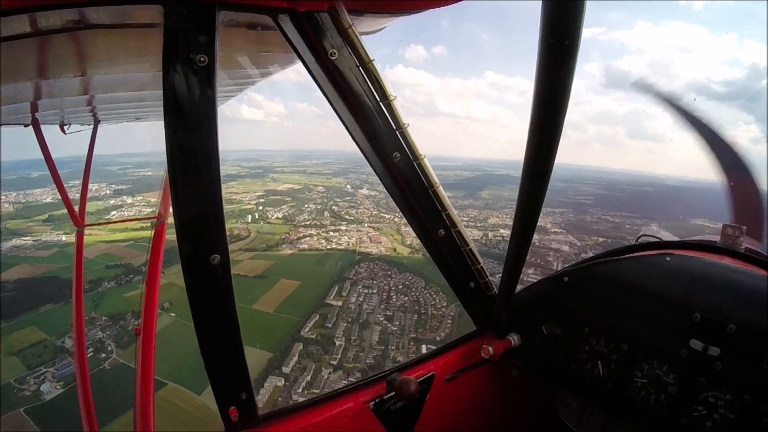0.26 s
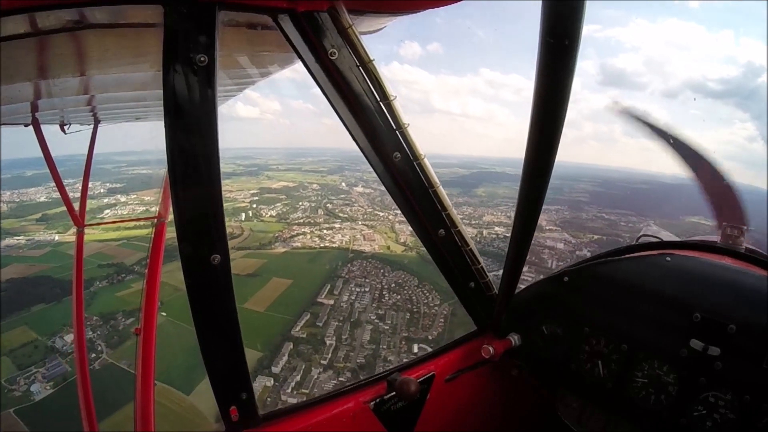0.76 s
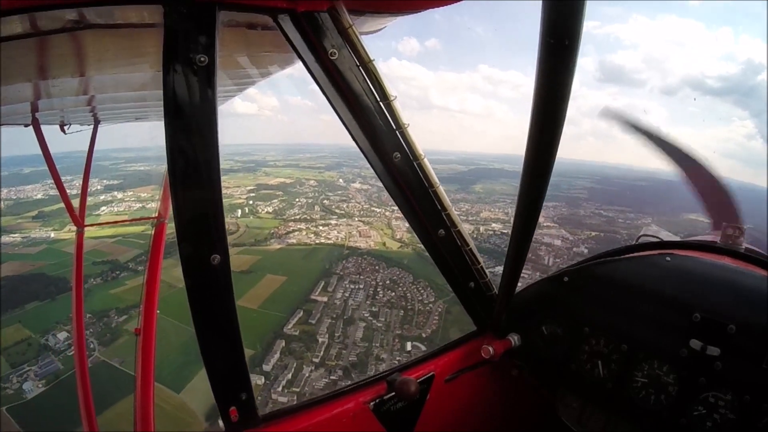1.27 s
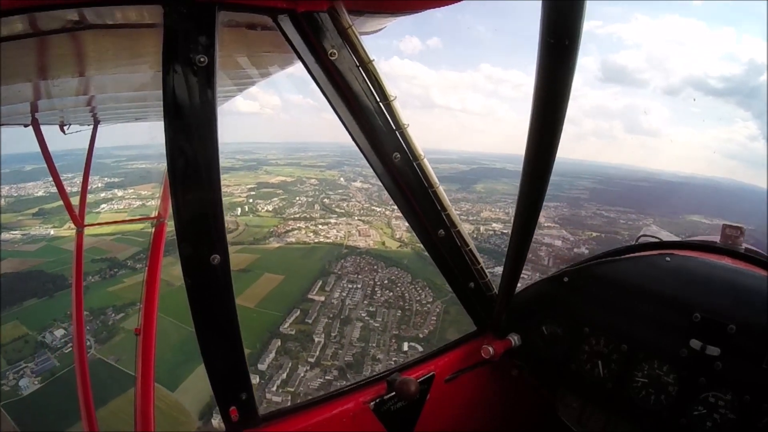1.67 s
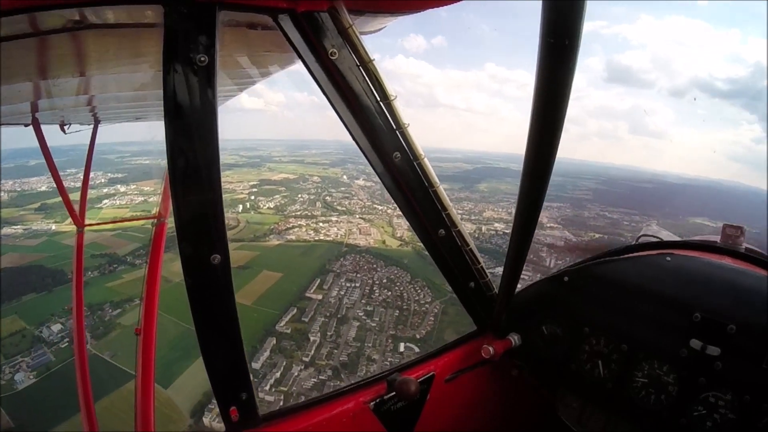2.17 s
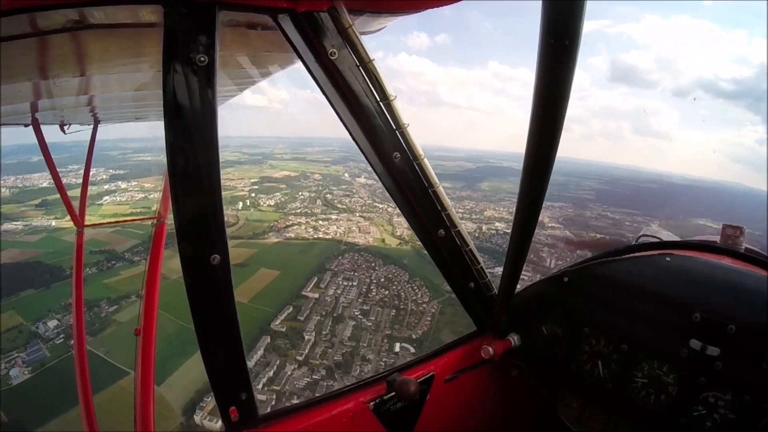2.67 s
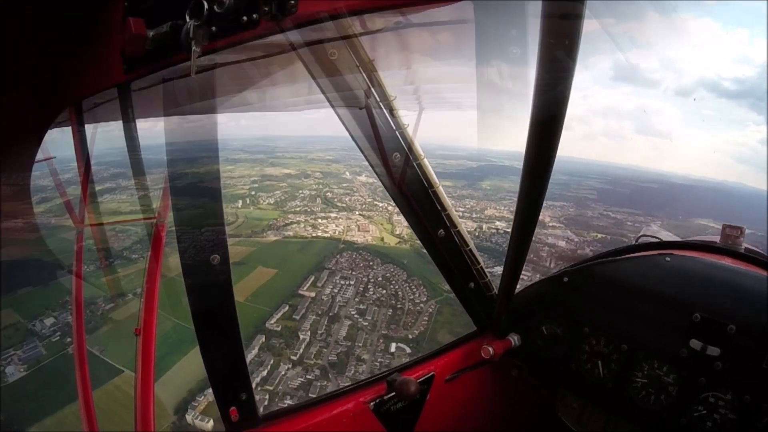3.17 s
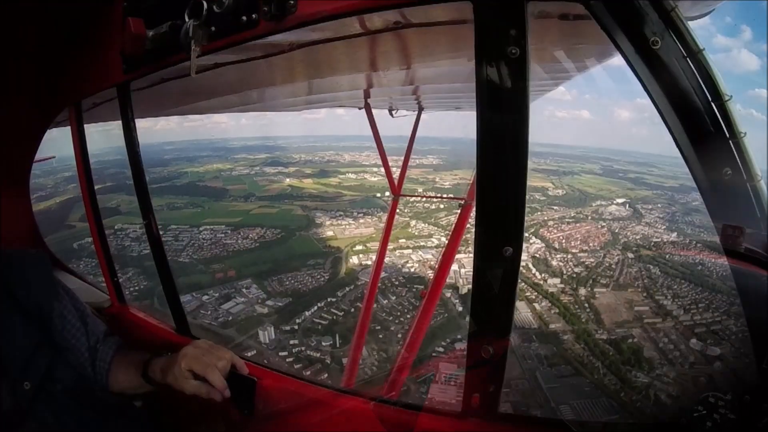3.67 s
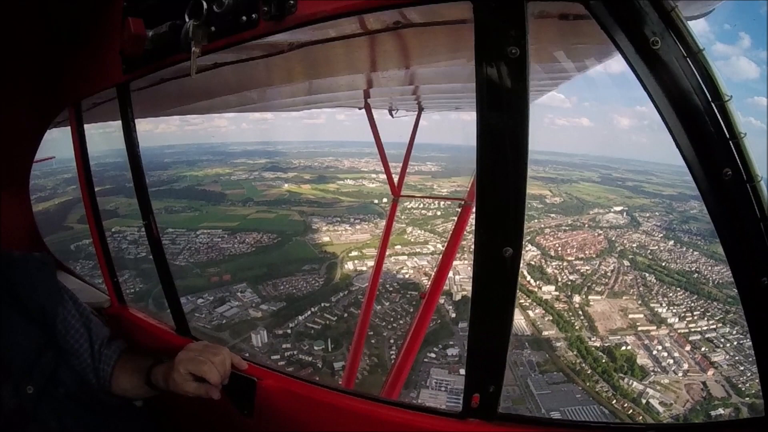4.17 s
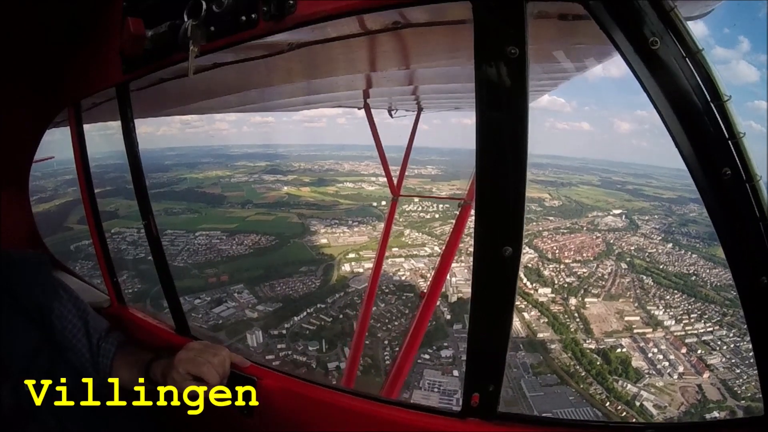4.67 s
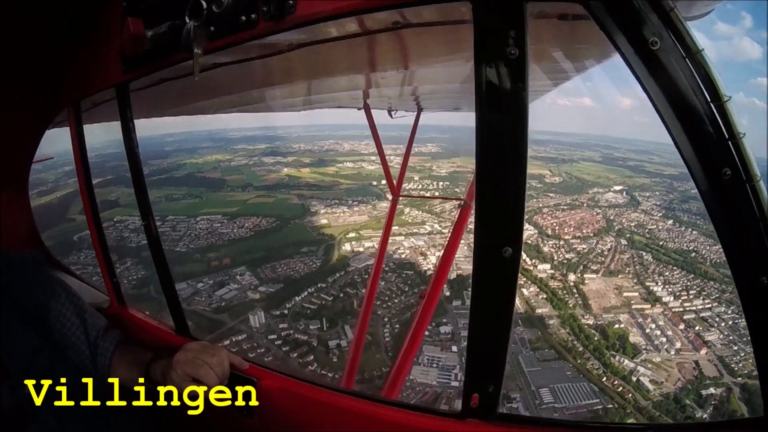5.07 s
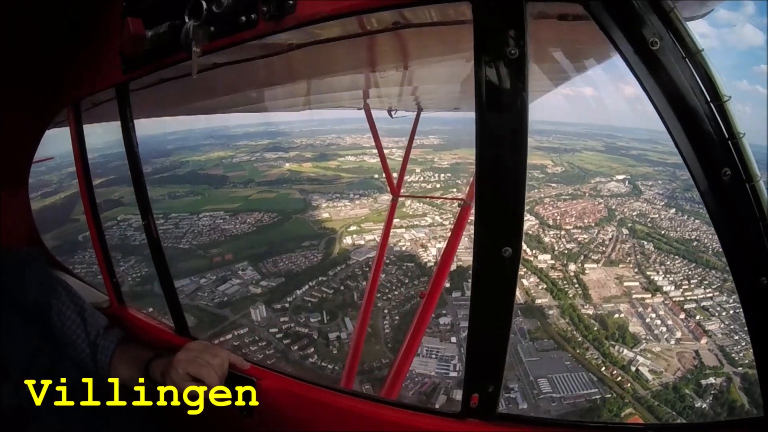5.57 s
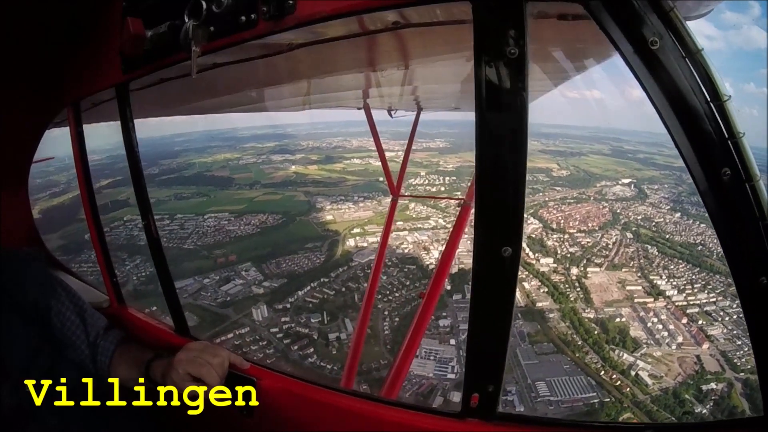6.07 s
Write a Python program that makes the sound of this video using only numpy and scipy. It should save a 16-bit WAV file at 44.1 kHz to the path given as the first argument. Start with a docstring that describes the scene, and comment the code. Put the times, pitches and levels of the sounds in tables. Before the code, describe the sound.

Heard from the cockpit of a light plane in flight, the piston engine and propeller hold a low, even drone throughout. Lumpy wind rumble on the microphone and a booming, hissing slipstream surround it, carrying faint wavering whistles. The rush of air gently rises and falls, now and then ducking briefly. Two faint ticks frame a slightly louder stretch midway, then the flight noise carries on as before.

```python
"""Light aircraft cockpit in flight

A four-cylinder piston engine and its propeller drone steadily, a stack of clean tones locked to
the crank. Around them sit low wind buffet and the slipstream's roar: a boom coloured by the cabin,
a hiss coloured by the microphone housing, and faint whistles. The roar swells slowly, with sudden
dips in level that quickly recover, and two faint ticks mark the start and end of a louder stretch."""
import sys
import numpy as np
from scipy import signal
from scipy.fft import rfft, irfft
from scipy.io import wavfile
from scipy.ndimage import uniform_filter1d

SR = 44100
rng = np.random.default_rng(int(sys.argv[2]) if len(sys.argv) > 2 else 0)


def persist_wave(psi):
    """Save psi, clipped to +-1, as 16-bit WAV."""
    counts = np.round(np.clip(psi, -1, 1) * 32767).astype(np.int16)
    wavfile.write(sys.argv[1], SR, np.atleast_2d(counts).T)


N = 279153
T = np.arange(N) / SR

# Slow swell of the air past the cabin. Each row: time in seconds, level in dB, extra cabin boom in dB.
AIRFLOW = [(0.0, -3, -1), (0.32, 1, -0.5), (0.5, -1, -1), (1.1, -1, 0.5), (1.52, -0.8, 0.5), (1.85, 1.5, 1),
           (2.02, 1.5, 2), (2.3, 1, 0.5), (2.56, -1, -0.5), (2.7, -0.5, 2), (2.82, 2, 0.5), (3.0, 0.1, 1),
           (3.45, 1.4, 1), (4.0, 0, 1.5), (4.15, 1.4, 2), (4.62, 0.6, .5), (4.8, 0.7, -1), (4.87, 3.5, 0.5),
           (4.96, -4.5, -1.5), (5.06, -3, -1), (5.3, -1, 0), (5.62, -2.2, -0.5), (6.12, 0.7, -0.5),
           (6.33, -1.5, 0)]
# The ticks around the louder stretch. Each row: time in seconds, level in dB before the high-pass.
TICKS = [(2.7154, -18.5), (4.2173, -16)]


def gain_of(db):
    """Decibels to amplitude."""
    return 10 ** (np.asarray(db) / 20)


def unit_rms(x):
    """Scales a signal to rms 1."""
    return x / np.sqrt(np.mean(x ** 2) + 1e-20)


def curve(rows, column=1):
    """One column of a time table, drawn as an automation line."""
    table = np.transpose(rows)
    return np.interp(T, table[0], table[column])


def gate(start_s, end_s):
    """Opens between two times, with 9 ms fades."""
    return uniform_filter1d(1. * ((T >= start_s) & (T <= end_s)), size=400)


def lowpass(x, hz):
    """A steep treble cut."""
    return signal.oaconvolve(x, signal.firwin(511, hz, window=("kaiser", 9), fs=SR), "same")


def drift(slow_hz, fast_hz):
    """A random wobble of rms 1: summed sines, the faster ones weaker."""
    t, hz = T[::64], np.geomspace(slow_hz, fast_hz, 24)[:, None]
    waves = np.sin(2 * np.pi * (hz * t + rng.random(hz.shape))) / np.sqrt(hz)
    return np.interp(T, t, unit_rms(waves.sum(0)))


def air_noise(colour, patchy_db, rings=(), size=512):
    """Coloured noise of rms 1, with drifting patches of turbulence and optional resonances."""
    frames, bins = 4 * N // size + 5, size // 2 + 1
    real, imag, patches = rng.standard_normal((frames, bins, 3)).T
    patches = uniform_filter1d(patches, size=6, axis=0)  # smear across pitch
    patches = unit_rms(uniform_filter1d(patches, size=14, axis=1))  # and across time
    spectra = (real + 1j * imag) * gain_of(patchy_db * patches)
    white = signal.istft(spectra, nperseg=size, noverlap=3 * size // 4)[1][:N]
    hz = np.fft.rfftfreq(N, 1 / SR)
    colour_hz, colour_db = np.transpose(colour)
    eq_db = np.interp(np.log(hz + 1), np.log(colour_hz + 1), colour_db, left=-120, right=-120)
    eq_db += sum(lift_db / (1 + (2 * (hz - centre) / width) ** 2) for centre, width, lift_db in rings)
    return unit_rms(irfft(rfft(white) * gain_of(eq_db), N))


def crank():
    """Running count of four-stroke cycles, two shaft turns each; the speed wavers a little."""
    cycle_hz = 16.508
    return np.cumsum(cycle_hz + .015 * drift(.2, 1.5)) / SR


def engine(cycles, louder_db):
    """Engine and propeller drone: sines at whole multiples (orders) of the cycle rate."""
    # The strong orders swell and sink. Each row: time in seconds, then a level in dB for each one.
    drone_levels = [(0.0, -18, -31, -29, -23, -30, -31), (0.6, -18.5, -29, -30, -28, -29, -32),
                    (0.9, -22, -33, -28, -31, -27, -30), (1.4, -21.5, -33, -40, -27, -32, -28),
                    (1.8, -25, -31, -33, -28, -29, -28), (2.2, -27, -26, -28, -29, -30, -28),
                    (2.6, -22, -28, -29, -31, -28, -32), (2.9, -25, -35, -21, -36, -24, -24),
                    (3.2, -33, -40, -22, -36, -23, -21.5), (3.55, -36, -25, -28, -23.5, -33, -26),
                    (4.05, -27, -20.5, -28, -24, -32, -28), (4.4, -23, -25, -36, -31, -28, -31),
                    (4.7, -26, -24, -28, -27, -31, -30), (4.9, -18, -27, -31, -31, -32, -33),
                    (5.4, -18, -31, -31, -25, -28, -29), (5.8, -23, -28, -28, -29, -32, -32),
                    (6.1, -23, -29, -36, -29, -33, -29), (6.33, -20, -29, -33, -27, -32, -28)]
    # Uneven cylinders and airframe shake. Each row: order, base level in dB.
    shake_orders = [(2, -36), (3, -36), (7, -37), (11, -38), (14, -45), (16, -40), (18, -45), (22, -44),
                    (27, -49), (28, -51), (31, -51), (35, -42), (39, -40), (43, -43), (47, -42), (51, -42),
                    (55, -43), (58, -52), (64, -52), (67, -53), (73, -53), (80, -51), (90, -52), (117, -57)]
    drone = np.zeros(N)
    for column, order in enumerate((4, 5, 6, 8, 9, 12), start=1):
        tone = np.sin(2 * np.pi * (order * cycles + rng.random()))
        drone += gain_of(curve(drone_levels, column)) * tone
    for order, db in shake_orders:
        waver_db = 2.2 * drift(.3, 3.)
        tone = np.sin(2 * np.pi * (order * cycles + rng.random()))
        drone += gain_of(db + louder_db + waver_db) * tone
    return np.sqrt(2) * drone


def whistle(start_s, end_s, hz, db):
    """A thin, fuzzy whistle, perhaps air across a gap: the pitch wanders and the level flutters."""
    pitch_hz = hz + 14 * drift(.5, 6.) + 12 * drift(8., 60.)
    flutter_db = 2.8 * drift(1., 8.) + 2.5 * drift(10., 50.)
    tone = np.sqrt(2) * np.sin(2 * np.pi * np.cumsum(pitch_hz) / SR)
    return gate(start_s, end_s) * gain_of(db + flutter_db) * tone


def slipstream_hiss(cycles, rides_db):
    """Rushing air rings the microphone housing, with a rasp near 2 kHz and faint whistles on top."""
    # EQ curves of the hiss and the rasp. Each row: frequency in Hz, level in dB.
    hiss_colour = [(560, -46), (950, -5), (1150, -6.5), (1510, -6), (1840, -8.5), (1940, -6.5),
                   (2230, -7.5), (2370, -11.5), (2780, -14.5), (3460, -14.5), (3840, -16), (4360, -15.5),
                   (4900, -17), (8130, -25), (12600, -39.5), (15000, -43)]
    rasp_colour = [(1780, -30), (1910, 0), (2070, 0), (2230, -2), (2380, -30)]
    # Housing resonances. Each row: centre in Hz, width in Hz, lift in dB.
    housing_rings = [(1260, 150, 4), (1520, 85, 2), (2070, 210, 0.5), (3380, 380, 3.5), (4370, 230, 2)]
    # The rasp comes and goes. Each row: time in seconds, level in dB against the hiss.
    rasp_levels = [(0.0, -12), (0.4, -14), (0.8, -17), (2.5, -22), (2.8, -16), (3.6, -13), (3.9, -26),
                   (4.15, -13), (4.7, -20), (5.1, -11), (6.33, -14)]
    # Each row: start and end in seconds, pitch in Hz, level in dB against the hiss.
    whistles = [(0.0, 4.216, 3455, -19), (2.715, 6.33, 3350, -22), (0.0, 2.715, 3310, -25),
                (2.715, 6.33, 3550, -25), (4.216, 6.33, 3440, -24)]
    rasp = gain_of(curve(rasp_levels)) * air_noise(rasp_colour, patchy_db=1.2)
    hiss = air_noise(hiss_colour, patchy_db=.59, rings=housing_rings)
    puff = 1 + .055 * np.cos(2 * np.pi * cycles)  # each engine cycle swells the hiss slightly
    whistling = sum(whistle(*row) for row in whistles)
    return gain_of(-31.5 + rides_db.sum(0)) * ((hiss + rasp) * puff + whistling)


def cabin_boom(rides_db):
    """The slipstream booms in the cabin, a low-mid roar that swells with the airflow."""
    # The cabin's EQ curve. Each row: frequency in Hz, level in dB.
    boom_colour = [(140, -46), (240, -7.5), (329, 1), (390, -5.5), (476, -12.5), (525, -5.5), (550, -5.5),
                   (580, 0), (650, 0), (705, -0.5), (743, -5.5), (825, -5), (1050, -20), (1360, -72),
                   (2310, -120)]
    follow = (.68, 1, .72)  # shares of airflow, level dips and louder stretch
    level_db = -22 + follow @ rides_db + curve(AIRFLOW, column=2)
    return gain_of(level_db) * air_noise(boom_colour, patchy_db=.62)


def buffet(rides_db):
    """Lumpy low pressure swings of the wind; the deepest band swells on its own."""
    # The buffet's EQ curve. Each row: frequency in Hz, level in dB.
    buffet_colour = [(7, -36), (14, -25), (30, -11.5), (50, -5), (66, -2), (82, -2.5), (105, -0.5),
                     (125, -4.5), (165, -4), (200, -6.5), (225, -13.5), (280, -14), (360, -69)]
    # Band faders. Each row: time in seconds, gain in dB above the split, gain in dB below it.
    band_levels = [(0.0, 1, -5), (0.6, -0.5, -8), (1.2, 2.5, 0), (1.8, 1, -1), (2.4, -0.5, 0),
                   (3.0, 1, -0.5), (3.6, 0, 1), (4.2, 0, -1), (4.8, 0, -2), (5.3, 0, -1), (5.8, 0, -5),
                   (6.33, 0.5, 2)]
    split_hz = 90
    follow = (.84, .41, 1.32)  # shares of airflow, level dips and louder stretch
    level_db = -17.5 + follow @ rides_db + .5 * drift(2.8, 19.)
    swings = air_noise(buffet_colour, patchy_db=.5, size=2048)
    deep = signal.sosfiltfilt(signal.butter(3, split_hz, fs=SR, output="sos"), swings)
    upper_band = gain_of(curve(band_levels)) * (swings - deep)
    lower_band = gain_of(curve(band_levels, column=2)) * deep
    return gain_of(level_db) * (upper_band + lower_band)


def level_dips():
    """A ride in dB: the roar's level climbs, ducks suddenly and recovers, like gain control pumping."""
    # Each row: time of the dip in seconds, nominal drop in dB, recovery time in seconds.
    dips = [(0.238, 6, .08), (0.505, 9, 0.072), (0.677, 11.5, 0.036), (0.853, 1.5, 0.063),
            (1.029, 8, 0.064), (1.979, 3.5, 0.076), (2.096, 3.5, 0.079), (2.246, 6, .08), (2.897, 2, .07),
            (3.17, 5, 0.078), (3.34, 6, .07), (3.522, 4.5, 0.11), (3.647, 2.5, .07), (3.765, 5, 0.044),
            (4.238, 8, 0.11), (4.837, 9.5, .06), (5.555, 4.5, .06), (5.674, 5.5, 0.063),
            (6.068, 5.5, 0.054), (6.237, 5.5, .06)]
    climb_s, duck_s, crest_share = .062, .014, .51  # the crest is the part above the airflow level
    at_s, drop_db, recovery_s = np.transpose(dips)[:, :, None]
    since = T - at_s
    ducked = .5 + .5 * np.tanh(since / duck_s)
    crest = crest_share * (1 - ducked) * np.exp(np.minimum(since, 0) / climb_s)
    trough = (1 - crest_share) * ducked * np.exp(-np.maximum(since, 0) / recovery_s)
    return (drop_db * (crest - trough)).sum(0)


def ticks():
    """Single-sample clicks, heard only in the treble."""
    clicks = np.zeros(N)
    for at_s, db in TICKS:
        clicks[round(at_s * SR)] = gain_of(db)
    return signal.lfilter(*signal.butter(2, 4000, "high", fs=SR), clicks)


def scene():
    """Drone, slipstream, buffet and ticks, mixed at one microphone."""
    cycles = crank()
    louder_db = 2 * gate(TICKS[0][0], TICKS[1][0])
    rides_db = np.array([curve(AIRFLOW), level_dips(), louder_db])
    drone = engine(cycles, louder_db)
    slipstream = slipstream_hiss(cycles, rides_db) + cabin_boom(rides_db)
    flutter = gain_of(.5 * drift(7.6, 60.))
    cockpit = drone + flutter * slipstream + buffet(rides_db)
    return (lowpass(cockpit, hz=15000) + ticks())[None]


def record(dry):
    """Soft-clips the highest peaks, then trims the extreme treble."""
    mono, knee = dry[0], .7  # peaks round off above this share of full scale
    over = np.maximum(abs(mono) - knee, 0) / (1 - knee)
    rounded = np.clip(mono, -knee, knee) + np.sign(mono) * (1 - knee) * np.tanh(over)
    return lowpass(rounded, hz=15700)[None]


dry = scene()
out = record(dry)
persist_wave(out)
```